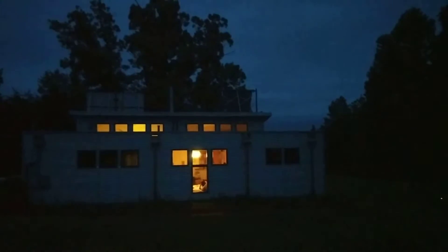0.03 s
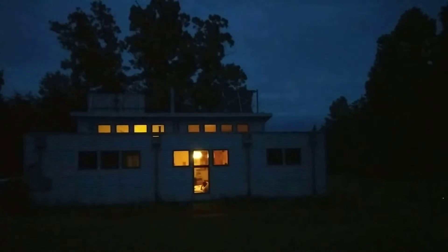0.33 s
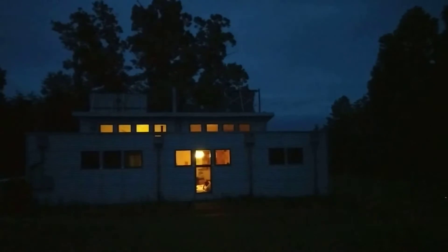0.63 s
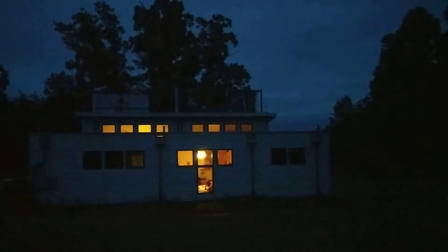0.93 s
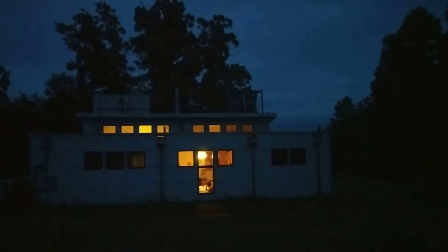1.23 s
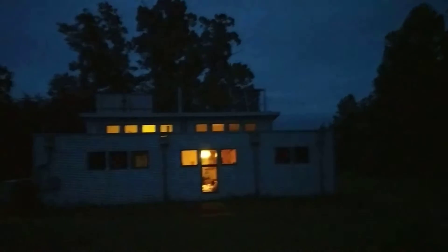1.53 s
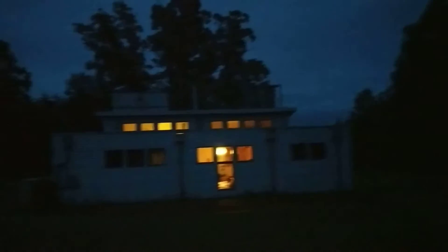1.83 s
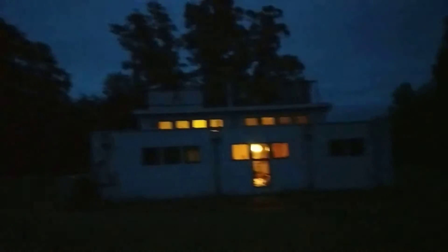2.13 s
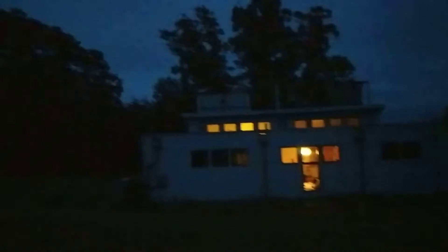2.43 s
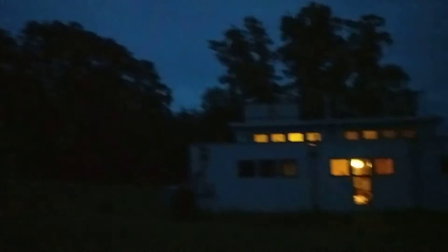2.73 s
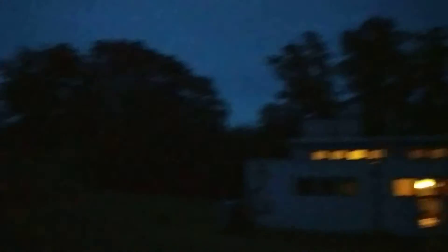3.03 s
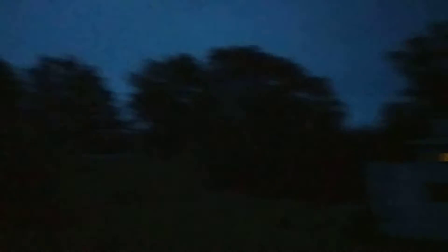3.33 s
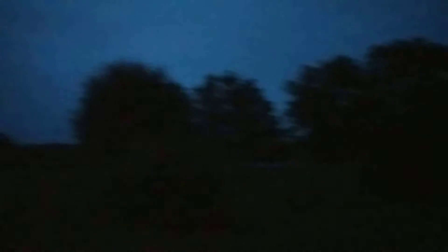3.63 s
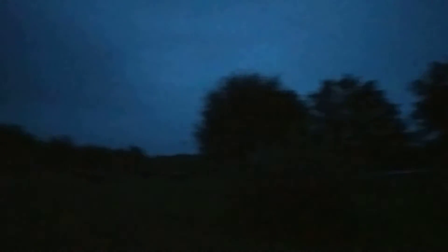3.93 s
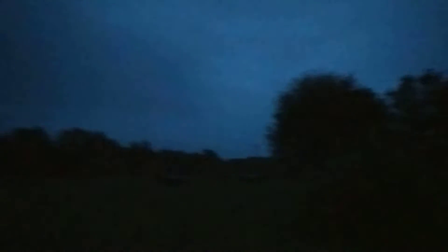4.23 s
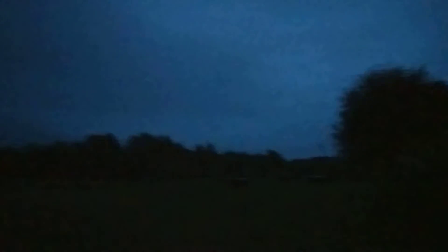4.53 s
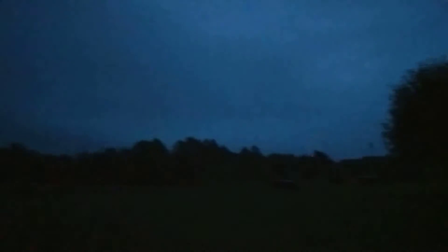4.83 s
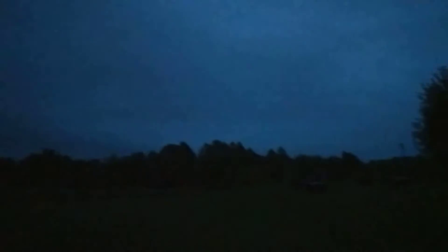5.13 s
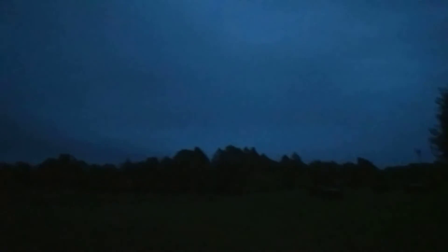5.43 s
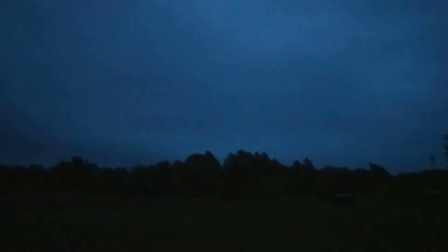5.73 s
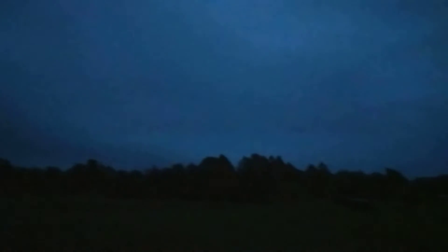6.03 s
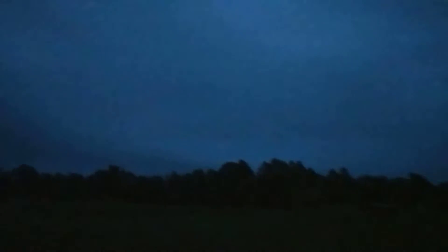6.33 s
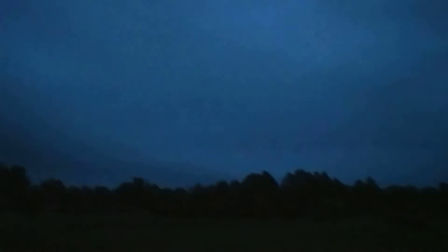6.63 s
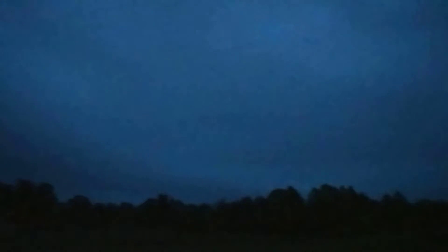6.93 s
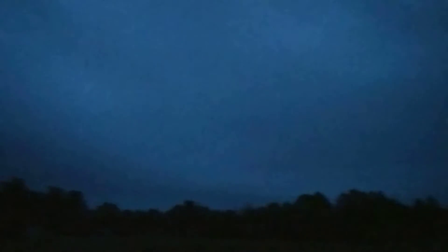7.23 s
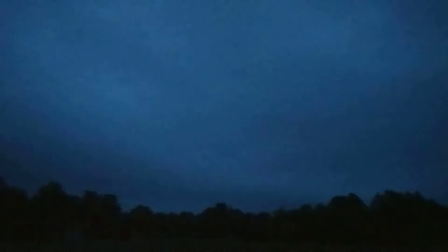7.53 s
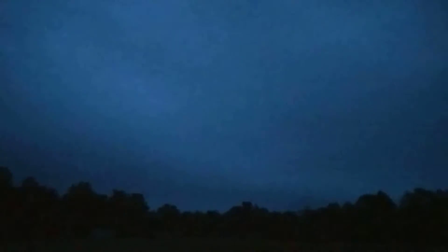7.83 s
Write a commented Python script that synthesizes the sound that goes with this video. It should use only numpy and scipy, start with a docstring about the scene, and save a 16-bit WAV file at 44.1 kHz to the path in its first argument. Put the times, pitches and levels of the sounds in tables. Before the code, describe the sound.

Frogs trill in a field at dusk, each trill a run of quick rising chirps lasting half a second to a second, slightly echoed by trees. Trills start at 0, 0.5, 1.8, 3.7, 5.1, 5.7 and 7.1 seconds; the one at 5.1 is strongest, the last is faint. Low wind rumble with irregular thumps buffets the microphone from the start and is the loudest sound, gusting near 0.7, 2.1 and 3.8 seconds, then dying away by about 4.7. The hand-held camera ticks softly a few times between 3.2 and 3.7 seconds. From 3.4 seconds a faint bush-cricket buzzes in very high, pulsing phrases, longest between 4.6 and 7.2. Leaves rustle briefly and softly near 5.8. Throughout runs a quiet bed of leaf hiss, distant frog chorus, a far engine hum and two barely audible high whines.

```python
"""From the start, frogs trill around a field at dusk: trains of quick upward chirps, scattered by trees and a
house wall, over a distant chorus, hissing leaves, a far engine hum and two faint high whines. Through the first
half, turbulent wind buffets the microphone. Just after 3 s the hand-held camera ticks softly, and a bush-
cricket begins to scrape its wings in very high, buzzing phrases. The wind dies down, the camera rustles once in
the hand near 5.8 s, and frogs and cricket call on to the end."""
import sys
import numpy as np
from scipy import signal
from scipy.fft import rfft, irfft
from scipy.io import wavfile

SR = 44100
rng = np.random.default_rng(int(sys.argv[2]) if len(sys.argv) > 2 else 0)


def master_out(mix):
    """Clip the mix to full scale and print it as 16-bit PCM to the path in sys.argv[1]."""
    frames = np.transpose(np.atleast_2d(mix))
    ceiling = np.clip(frames, -1, 1)
    pcm = np.round(ceiling * 32767).astype(np.int16)
    wavfile.write(sys.argv[1], SR, pcm)


N = 347067
TIME = np.arange(N) / SR


def from_db(db):
    """Amplitude ratio of a level in decibels."""
    return 10 ** (np.asarray(db) / 20)


def unit(x):
    """Normalisation to unit rms."""
    return x / np.sqrt(np.mean(x ** 2) + 1e-20)


def response(spectrum, hz):
    """Magnitude response of (f/Hz, level/dB) points, interpolated in log frequency."""
    f, db = np.transpose(spectrum)
    return from_db(np.interp(np.log(hz + 1), np.log(f + 1), db))


def envelope(curve):
    """Amplitude envelope through (t/s, level/dB) points."""
    return from_db(np.interp(TIME, *np.transpose(curve)))


def add(mix, s, sound):
    """Superposition of a sound on the mix, starting at s seconds."""
    start = round(s * SR)
    sound = sound[max(-start, 0):]
    part = mix[max(start, 0):][:len(sound)]
    part += sound[:len(part)]


def noise(spectrum):
    """Spectral shaping of white noise, at unit rms."""
    return unit(irfft(rfft(rng.standard_normal(N)) * response(spectrum, np.fft.rfftfreq(N, 1 / SR)), N))


def drift(per_s):
    """Random modulation at unit rms: linear interpolation between chance values."""
    return unit(np.interp(TIME * per_s, np.arange(2000), rng.standard_normal(2000)))


# Resonances of vocal sac and throat: f/Hz, level/dB
VOCAL_SAC = [(700, -29), (950, -16), (1150, -10.5), (1350, -11.5), (1600, -22), (1850, -10), (2060, 4),
             (2200, -1), (2380, -8.5), (2700, -26.5), (3300, -28), (4500, -37)]

def chirp(pitch_hz, sweep_s, rise=.2, bend=.22, attack=.73, release=.95):
    """Source and filter: the vocal cords glide up, and harmonic 2 flares at the sac's resonance."""
    t = np.arange(-SR // 32, SR // 32) / SR
    u = t / sweep_s
    hz = pitch_hz * np.exp(np.clip(rise * u + bend * np.maximum(u, 0) ** 2, -.5, .5))
    cycles = np.cumsum(hz) / SR
    swell = np.exp(-np.where(u < 0, (u / attack) ** 2, abs(u / release) ** 5))
    sac_size = (1060 / pitch_hz) ** .28  # a higher voice comes with a smaller sac
    return swell * sum(response(VOCAL_SAC, k * hz * sac_size)
                       * np.sin(2 * np.pi * k * (cycles + rng.random())) for k in (1, 2, 3))


# Reflection spectrum of the trees: f/Hz, level/dB
TREE_REFLECTION = [(1100, -1.5), (1400, -7.5), (1880, -8), (2100, -1.5), (2280, 4.5), (2600, 9), (3400, 1)]

def scatter(t60_s=.59, first_s=.007, taps_per_s=900):
    """Scattering by trunks and ground: a sparse impulse response with unit gain in the frogs' band."""
    t = np.arange(SR // 2) / SR
    hz = np.fft.rfftfreq(len(t), 1 / SR)
    taps = rng.standard_normal(len(t)) * (rng.random(len(t)) < taps_per_s / SR) * (t > first_s)
    transfer = rfft(taps * from_db(-60 * t / t60_s)) * response(TREE_REFLECTION, hz)
    band_power = np.average(abs(transfer) ** 2, weights=response(VOCAL_SAC, hz) ** 3)
    return irfft(transfer, len(t)) / np.sqrt(band_power)


def trill(first_s, last_s, count, db, swell_s, fade_db, slowing=.032, onset_db=-13, spread_db=.6):
    """Times and levels of a modulated pulse train: the voice swells, holds and fades as its rate drops."""
    u = np.linspace(0, 1, round(count))
    age = (last_s - first_s) * (u - slowing * u * (1 - u))
    effort_db = onset_db * np.exp(-age / swell_s) + fade_db * u ** 4.5
    return zip(first_s + age, db + effort_db + spread_db * rng.standard_normal(len(u)))


# Frog trills: first chirp t/s, last chirp t/s, chirp count, relative level/dB, swell t/s,
# final fade level/dB, fundamental f/Hz, sweep t/s, scattered re direct level/dB
FROG_TRILLS = [(-0.16, 0.44, 14, -62, 0.037, -3, 1166, 0.016, 3),
               (0.483, 1.25, 18, -57.5, 0.08, -8, 1107, .02, 4),
               (1.756, 2.727, 19, -54, 0.056, -1.5, 1031, .021, -1.5),
               (3.67, 4.27, 12, -64, 0.071, -5, 1090, .018, 6.5),
               (5.084, 5.669, 12, -50.7, 0.036, -2, 1054, .019, -4),
               (5.711, 6.158, 9, -62, .005, -2.5, 1135, .016, 0),
               (7.12, 7.76, 13, -69.5, 0.043, -4, 1100, .016, 6)]

def frogs(gain_db=4.5, jitter=.0079, sharpen_per_db=.0018, leaf_share=.46, echo_s=.02, echo_db=-18):
    """Multipath propagation: each chirp arrives directly, by one echo and by scattering."""
    out = np.zeros(N)
    for first_s, last_s, count, full_db, swell_s, fade_db, pitch_hz, sweep_s, wet_db in FROG_TRILLS:
        trunks = scatter()
        for s, db in trill(first_s, last_s, count, full_db, swell_s, fade_db):
            detune = sharpen_per_db * (db - full_db) + jitter * rng.standard_normal()
            call = chirp(pitch_hz * (1 + detune), sweep_s)
            # trunks answer every chirp alike, moving leaves differently each time
            path = from_db(wet_db) * (np.sqrt(1 - leaf_share) * trunks + np.sqrt(leaf_share) * scatter())
            path[0] += 1  # direct sound
            add(path, echo_s, from_db([echo_db]))
            # a share of the scatter overlaps the chirp and counts toward its level
            gain = from_db(db + gain_db) / np.sqrt(1 + .7 * from_db(wet_db) ** 2)
            add(out, s - len(call) / SR / 2, gain * signal.fftconvolve(call, path))
    return out


def chorus(pitch_hz=1100, per_s=500, level_db=-77, swell_db=1):
    """Incoherent summation: many distant frogs blur into a faint shimmering band."""
    calls = np.zeros(N)
    for ratio in (.97, 1, 1.04):
        onsets = rng.standard_normal(N) * (rng.random(N) < per_s / SR)
        calls += signal.oaconvolve(onsets, chirp(pitch_hz * ratio, sweep_s=.016), "same")
    return unit(calls) * from_db(level_db + swell_db * drift(2.4))


# Envelope of the leaf hiss: t/s, level/dB
LEAF_ENVELOPE = [(0.0, -68), (2.58, -68), (3.9, -72.5), (4.9, -73), (6.66, -70.5), (7.87, -68.5)]
# Spectrum of the leaf hiss: f/Hz, level/dB
LEAF_SPECTRUM = [(300, -14), (900, -9.5), (1800, 0.5), (2900, -0.5), (4000, -3), (5500, -8), (7500, -13),
                 (10000, -18), (12500, -21), (16000, -21.5)]

def leaves(gain_db=4, flutter_db=.16, rustle_s=5.82, half_width_s=.045, rustle_db=-69):
    """Addition of powers: the broadband hiss of leaves and one brief rustle of the camera in the hand share an
    envelope."""
    rustle = from_db(rustle_db) * np.exp(-((TIME - rustle_s) / half_width_s) ** 2)
    stir = np.hypot(envelope(LEAF_ENVELOPE), rustle)
    return noise(LEAF_SPECTRUM) * stir * from_db(gain_db + flutter_db * drift(10))


# Spectrum of the open air: f/Hz, level/dB
AIR_SPECTRUM = [(20, -27), (35, -6.5), (60, -2), (100, -1), (150, -1), (210, -5), (330, -6.5), (480, -8.5),
                (750, -11), (1100, -10), (1800, -17.5), (2400, -18.5), (4000, -77)]

def open_air(level_db=-66, swell_db=.15):
    """Ambient noise: a nearly stationary low murmur."""
    return noise(AIR_SPECTRUM) * from_db(level_db + swell_db * drift(11))


# Swells of the far engine: start t/s, end t/s, harmonic order, level/dB
ENGINE_ORDERS = [(0, 6.3, 2, -66.5), (0, 6.25, 3, -66.5), (6.6, 8.1, 2, -67)]

def engine_hum(rotation_hz=38.15, fade_s=.17, flutter_db=.5):
    """Harmonics of rotation: two orders of a far, steadily running engine fade in and out."""
    turns = np.cumsum(rotation_hz * (1 + .003 * drift(3))) / SR
    out = np.zeros(N)
    for start, end, order, db in ENGINE_ORDERS:
        swell = np.clip(np.minimum(TIME - start, end - TIME) / fade_s, 0, 1)
        out += from_db(db + flutter_db * drift(3.3)) * swell * np.sin(2 * np.pi * round(order) * turns)
    return np.sqrt(2) * out


# Thin high whines: centre f/Hz, half-width f/Hz, level/dB
WHINE_BANDS = [(8000, 79, -88.5), (11660, 27, -91.5)]
# Gain of the whines, greatest facing the field: t/s, level/dB
WHINE_ENVELOPE = [(0, -2), (2.8, -2), (3.8, -2.5), (5, -4), (6.2, -2), (7.87, -2)]

def whines():
    """Narrowband noise: two slim spectral peaks are heard as faint, fuzzy tones."""
    hz = np.fft.rfftfreq(N, 1 / SR)
    tones = np.zeros(N)
    for centre_hz, half_width_hz, db in WHINE_BANDS:
        band = rfft(rng.standard_normal(N)) / (1 + ((hz - centre_hz) / half_width_hz) ** 2)
        tones += from_db(db) * unit(irfft(band, N))
    return tones * envelope(WHINE_ENVELOPE)


# Envelope of the wind: t/s, level/dB
WIND_ENVELOPE = [(0.0, -39.5), (0.37, -43), (0.72, -40.5), (1.49, -51.5), (2.05, -48.5), (2.5, -58),
                 (3.0, -54.5), (3.55, -50.5), (3.8, -41.5), (3.99, -55), (4.45, -59.5), (4.7, -68),
                 (5.5, -70), (6.4, -75), (7.87, -73)]
# Spectrum of the wind: f/Hz, level/dB
WIND_SPECTRUM = [(20, -29), (35, -16.5), (50, 4), (70, 1.5), (110, -5.5), (150, -14), (200, -19),
                 (280, -30), (380, -36.5), (600, -59), (1200, -85)]

def wind(gain_db=1, lumps_db=1.5):
    """Turbulence: pressure fluctuations at the microphone port make a lumpy rumble."""
    return noise(WIND_SPECTRUM) * envelope(WIND_ENVELOPE) * from_db(gain_db + lumps_db * drift(21.96))


# Eddies striking the microphone: onset t/s, relative level/dB, ring f/Hz, decay t/s
EDDIES = [(0.041, -27.5, 89, .011), (0.099, -28.5, 84, .014), (0.167, -29, 81, 0.0085),
          (0.577, -29.5, 69, 0.016), (.69, -30, 89.6, 0.013), (1.716, -31.5, 66.6, 0.016),
          (1.819, -35.5, 70, 0.021), (1.955, -31, 61.6, 0.019), (2.149, -25.5, 64.6, 0.029),
          (2.812, -39, 106, 0.044), (2.848, -30.5, 67.5, 0.032), (3.218, -35, 59, .0065),
          (3.488, -26.5, 64, 0.012), (3.709, -28.5, 65.4, 0.023), (3.846, -22, 62.8, 0.032),
          (4.18, -39.5, 51.7, 0.021)]

def buffets(rise=.29, sag=.4, sag_s=.0072, churn_db=-13.5, gain_db=2.5):
    """Damped oscillation: an eddy shoves the microphone, whose swing slows to its ring frequency."""
    swing, puff, t = np.zeros(N), np.zeros(N), np.arange(SR // 4) / SR
    median_db = np.median([row[1] for row in EDDIES])
    for s, db, hz, decay_s in EDDIES:
        age = t / decay_s
        push = from_db(db + gain_db) * (1 - np.exp(-(age / rise) ** 2)) * np.exp(-.6 * age ** 1.46)
        cycles = np.cumsum(hz * (1 + sag * np.exp(-t / sag_s))) / SR
        add(swing, s, -push * np.sin(2 * np.pi * cycles))
        add(puff, s, push * from_db(.97 * (db - median_db)))  # stronger eddies churn more air
    churn = noise([(25, -16), (48, 7), (130, 1), (210, -4), (340, -21.5), (500, -44), (1000, -78)])
    return swing + from_db(churn_db) * puff * churn


# Handling ticks: onset t/s, level/dB, resonance f/Hz
CASE_TICKS = [(3.169, -51, 1110), (3.203, -53, 1300), (3.484, -54, 945), (3.628, -53, 1300),
              (3.671, -50, 1880)]

def camera_ticks(decay_s=.0038, width_hz=900):
    """Heavily damped resonance: the camera's case clicks dully as it turns in the hand."""
    out, t = np.zeros(N), np.arange(SR // 20) / SR
    for s, db, hz in CASE_TICKS:
        case = signal.iirpeak(hz, hz / width_hz, SR)
        ring = signal.lfilter(*case, signal.lfilter(*case, rng.standard_normal(len(t))))
        add(out, s, from_db(db) * unit(ring) * np.exp(-t / decay_s))
    return out


# Bush-cricket phrases: start t/s, end t/s, level/dB
CRICKET_PHRASES = [(3.39, 3.48, -77), (3.698, 3.85, -75), (4.63, 5.085, -71.5), (5.237, 5.962, -70),
                   (6.031, 7.21, -71.5), (7.689, 7.92, -71)]
# Spectrum radiated by the wings: f/Hz, level/dB
WING_SPECTRUM = [(9000, -33), (11500, -7.5), (12500, -8), (13500, 1.5), (14800, -1), (15800, 3)]

def cricket(pairs_per_s=16.1, waver=.037, unevenness=.17, smear=.71, grain=.17, bounce_s=.0019):
    """Stridulation: the wings scrape in paired strokes, short and long, smeared by the grass."""
    strokes = np.zeros(N)
    for start, end, db in CRICKET_PHRASES:
        t = np.arange(round((end - start) * SR)) / SR
        phase = 2 * np.pi * (pairs_per_s * t + waver * drift(8)[:len(t)])
        stroke = smear + np.clip(.7 - np.cos(2 * phase) - unevenness * np.cos(phase), 0, 1)
        add(strokes, start, from_db(db) * unit(stroke) * signal.windows.tukey(len(t), .22))
    buzz = strokes * noise(WING_SPECTRUM) * np.exp(grain * drift(240) - grain ** 2)
    return buzz + .45 * np.roll(buzz, round(bounce_s * SR))  # comb filtering by a ground reflection


def scene():
    """Linear superposition of all sources at one microphone."""
    bed = chorus() + leaves() + open_air() + engine_hum() + whines()
    return (frogs() + bed + wind() + buffets() + camera_ticks() + cricket())[None]


def record(dry, low_hz=31, high_hz=15880):
    """Band limiting: the microphone drops the deepest rumble and the highest treble."""
    highpass = signal.butter(4, low_hz, "high", fs=SR, output="sos")
    lowpass = signal.firwin(1023, high_hz, window=("kaiser", 9), fs=SR)
    return signal.oaconvolve(signal.sosfilt(highpass, dry), lowpass[None], "same")


dry = scene()
out = record(dry)
master_out(out)
```